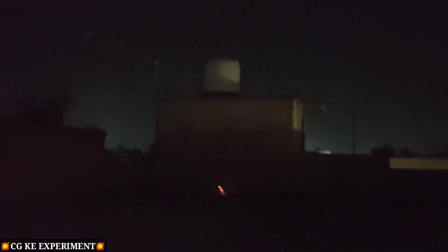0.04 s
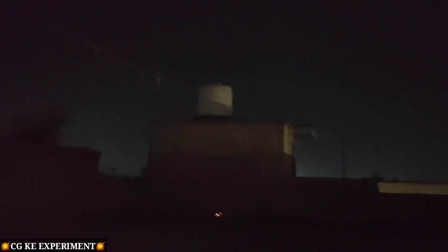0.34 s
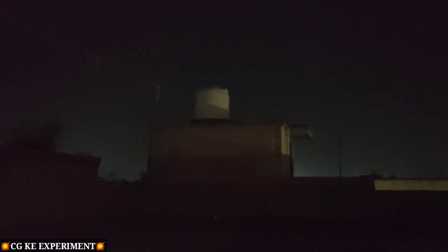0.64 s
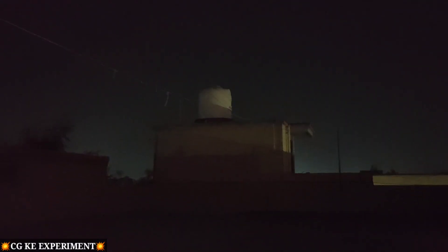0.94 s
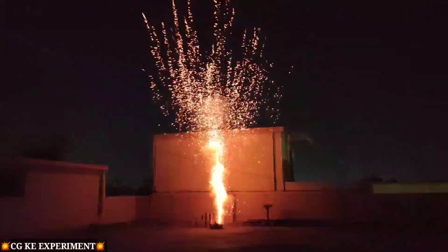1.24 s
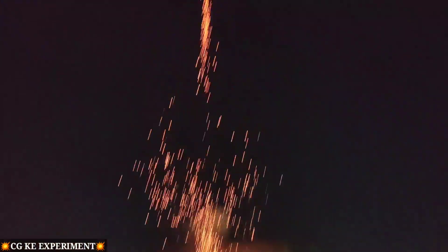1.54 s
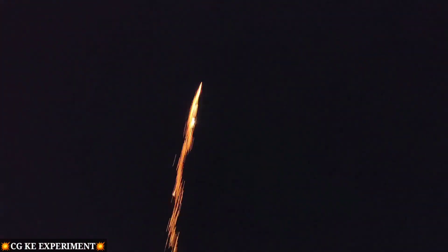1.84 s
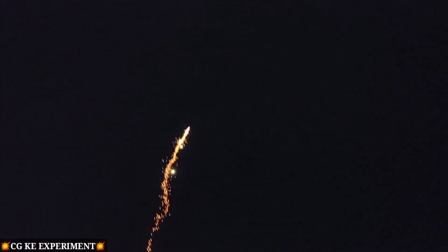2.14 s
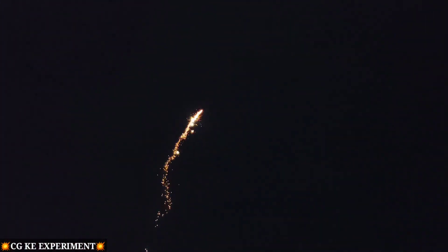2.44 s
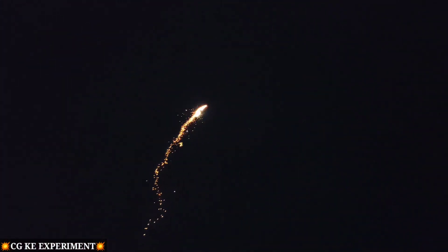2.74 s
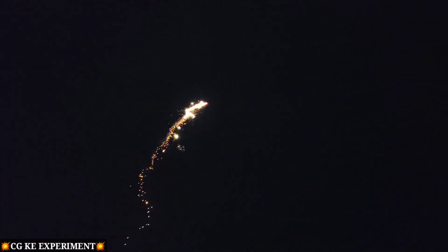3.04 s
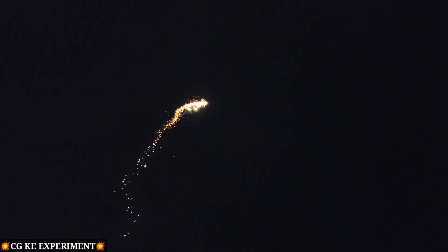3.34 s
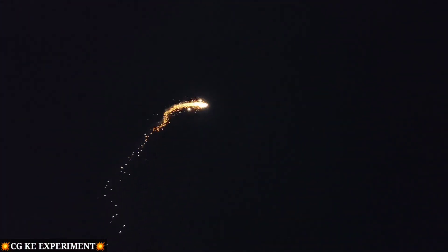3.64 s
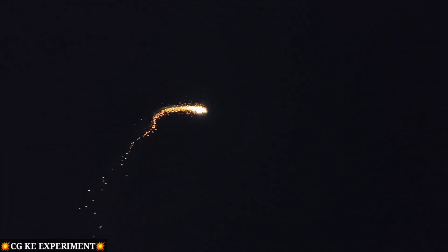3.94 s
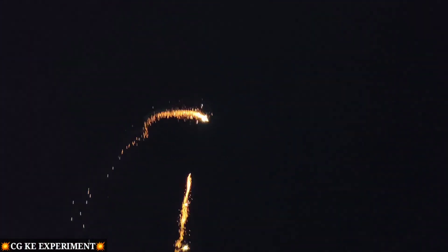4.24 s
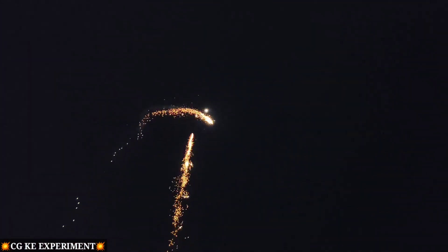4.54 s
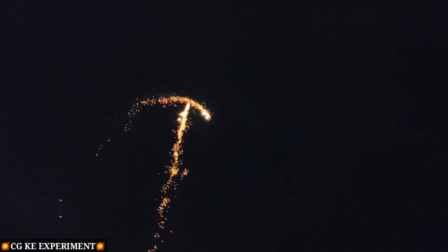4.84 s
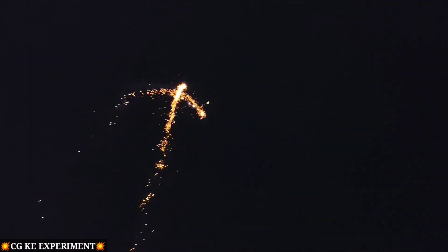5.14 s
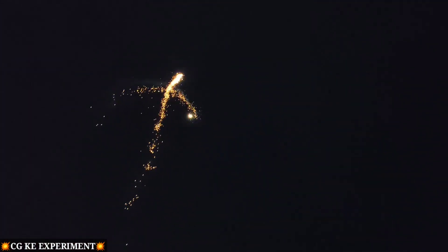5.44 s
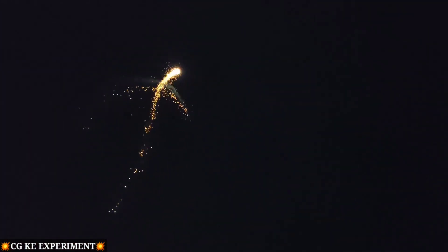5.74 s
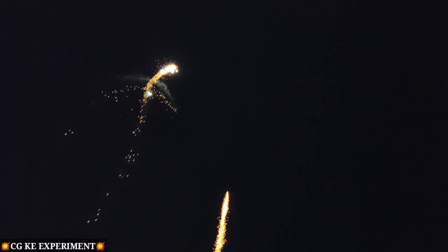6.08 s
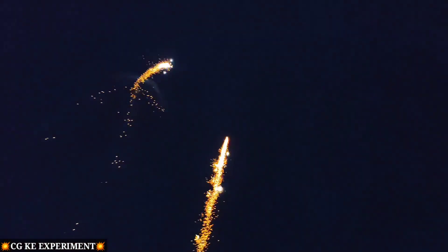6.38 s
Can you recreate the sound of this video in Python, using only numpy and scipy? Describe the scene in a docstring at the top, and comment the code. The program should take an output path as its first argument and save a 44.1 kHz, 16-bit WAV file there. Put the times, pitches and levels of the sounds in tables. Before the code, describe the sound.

In a walled yard at night, a fuse sputters briefly over a low outdoor rumble. A firework cake fires a loud, sharp blast that echoes off the walls. Sparks start snapping overhead and thicken into steady crackling with a fine sizzle, while two more launches follow about two seconds apart. Other fireworks thud dully in the distance. The blasts slightly overload the nearby microphone.

```python
"""A walled yard at night, with a firework cake: the fuse fizzes, a faint whistle swells, three tubes fire.
Each blast rings the tubes and returns from the walls as echoes and reverberation. The comets shed
crackling sparks overhead; each snap is a tiny shock wave, heard directly and by ground reflection.
Other fireworks thud far away over a low outdoor rumble; the recorder's limiter ducks under the blasts."""
import sys
import numpy as np
from scipy import signal
from scipy.fft import rfft, irfft, next_fast_len
from scipy.io import wavfile
from scipy.ndimage import uniform_filter1d, minimum_filter1d, map_coordinates

SR = 44100
rng = np.random.default_rng(int(sys.argv[2]) if len(sys.argv) > 2 else 0)


def generate_wav(sig):
    """Save sig (samples, or channels by samples) to the path in sys.argv[1] as 16-bit PCM at SR."""
    pcm = np.round(np.clip(np.atleast_2d(sig).T, -1, 1) * 32767).astype(np.int16)
    wavfile.write(sys.argv[1], SR, pcm)


N = 282681

# coherence of diffuse outdoor sound: (frequency [Hz], left-right correlation [1])
DIFFUSE_COHERENCE = [(40, 0.69), (150, 0.98), (500, 0.59), (1500, 0.048), (5000, 0.056)]
# surges and lulls of the comets' burning trails: (time [s], level [dB])
TRAIL_LEVEL = [(1.9, -62), (2.03, -75), (2.12, -61), (2.26, -57), (2.32, -51), (2.4, -66), (2.56, -45.5),
               (2.64, -47), (2.72, -41.5), (2.77, -37.5), (2.89, -38.5), (2.96, -35), (3.02, -39.5),
               (3.06, -35), (3.108, -47), (3.169, -37.5), (3.33, -35), (3.44, -37), (3.57, -37),
               (3.62, -34.5), (3.7, -32), (3.85, -31), (3.93, -37.5), (4.07, -38), (4.16, -34.5),
               (4.29, -39), (4.39, -34), (4.52, -38.5), (4.59, -32.5), (4.635, -42), (4.68, -32),
               (4.77, -32.5), (4.87, -33.5), (4.92, -36), (4.959, -43), (5.04, -34.5), (5.12, -30.5),
               (5.2, -34.5), (5.31, -31), (5.38, -35), (5.48, -35.5), (5.58, -39.5), (5.63, -37),
               (5.72, -35), (5.78, -36.5), (5.87, -42), (5.95, -34), (6.04, -38.5), (6.15, -31.5),
               (6.28, -37), (6.36, -33), (6.41, -35.5)]


def amp(db):
    """Decibels to amplitude ratio."""
    return 10 ** (np.asarray(db) / 20)


def unit(x):
    """Normalisation to rms 1."""
    return x / np.sqrt(np.mean(x ** 2) + 1e-20)


def along(points, hz):
    """Interpolation of (frequency [Hz], value) points on a logarithmic frequency axis."""
    f, v = np.transpose(points)
    return np.interp(np.log(hz + 1), np.log(f + 1), v)


def decay(t, t60):
    """Exponential decay from t = 0, by 60 dB every t60."""
    return (t >= 0) * np.exp(-np.log(1000) * np.maximum(t, 0) / t60)


def add(out, s, sound):
    """Superposition of a stereo sound from time s."""
    start = max(round(s * SR), 0)
    part = sound[:, :N - start]
    out[:, start:start + part.shape[1]] += part


def filtered(x, response):
    """Zero-phase filtering by a function of frequency."""
    n = x.shape[-1]
    m = next_fast_len(n + SR // 4)
    return irfft(rfft(x, m) * response(np.fft.rfftfreq(m, 1 / SR)), m)[..., :n]


def coloured(x, spectrum, size=4096):
    """Minimum-phase filtering: nothing sounds ahead of a click."""
    cepstrum = irfft(np.log(amp(along(spectrum, np.fft.rfftfreq(size, 1 / SR)))))
    cepstrum[1:size // 2] *= 2
    cepstrum[size // 2 + 1:] = 0
    impulse_response = irfft(np.exp(rfft(cepstrum)))
    return signal.fftconvolve(x, impulse_response[None], axes=1)[:, :x.shape[1]]


def noise(spectrum, coherence, count):
    """Partially coherent stereo noise of rms 1: the mid-side ratio sets the correlation."""
    turn = lambda hz: np.arccos(np.clip(along(coherence, hz), -1, 1)) / 2
    shape = lambda hz: amp(along(spectrum, hz)) * [np.cos(turn(hz)), np.sin(turn(hz))]
    mid, side = filtered(rng.standard_normal((2, count)), shape)
    return unit(np.array([mid + side, mid - side]))


def wobble(rate):
    """Smooth random modulation, rate knots a second."""
    return map_coordinates(rng.standard_normal(int(N * rate / SR) + 4), [np.arange(N) * rate / SR])


def rumble(trim_db=-1, flutter_db=2):
    """Ambient noise: a low outdoor rumble with a randomly modulated level."""
    # slow drift of the rumble: (time [s], level [dB])
    drift = [(0, -42.5), (.6, -44), (0.801, -47.5), (1.2, -38.5), (2.1, -46), (6.41, -45)]
    # its spectrum: (frequency [Hz], density [dB])
    spectrum = [(25, -4), (50, -19), (100, -3), (140, -4), (175, -2), (230, -10), (300, -16), (900, -21),
                (1400, -32), (1900, -55), (6000, -64)]
    level_db = np.interp(np.arange(N) / SR, *np.transpose(drift)) + trim_db + flutter_db * wobble(22)
    return amp(level_db) * noise(spectrum, DIFFUSE_COHERENCE, N)


def bursts(rows, spectrum, rise_s):
    """Noise transients with exponential rise and decay."""
    out, t = np.zeros((2, N)), np.arange(SR) / SR
    for s, db, t60 in rows:
        envelope = amp(db) * (1 - np.exp(-t / rise_s)) * decay(t, t60)
        add(out, s, envelope * noise(spectrum, DIFFUSE_COHERENCE, len(t)))
    return out


def fuse(sputter_db=3.0, sputters_per_s=220):
    """Combustion noise: the fuse burns in sputtering spurts of hiss and spits one dry tick."""
    # the spurts and the tick: (time [s], level [dB], t60 [s])
    spurts = [(0.002, -37.5, 0.09), (.04, -57, 0.46), (.12, -52.5, 0.38), (.138, -50, 0.27),
              (.333, -65, 0.032), (.425, -64.5, 0.57), (.465, -59, 0.33), (.588, -63, 0.081),
              (.98, -62, 0.013), (1.845, -53.5, 0.09), (1.924, -42, 0.11)]
    tick = [(.1205, -33.5, 0.049)]
    # their spectra: (frequency [Hz], density [dB])
    hiss_spectrum = [(400, 1), (1200, -17), (1800, -17), (3600, -1), (5600, 0), (7200, 9.5), (8200, -12)]
    tick_spectrum = [(200, -35), (550, 7), (1300, 0), (1800, -23), (6000, -24)]
    hiss = bursts(spurts, hiss_spectrum, rise_s=0.00055)
    sputter = unit(amp(sputter_db * wobble(sputters_per_s)))
    return hiss * sputter + bursts(tick, tick_spectrum, rise_s=0.00066)


def far_thuds(rise_s=0.0017, bass_hz=220):
    """Distant fireworks arrive as dull, exponentially decaying transients, some with more bass."""
    # far explosions: (time [s], level [dB], t60 [s], bass shelf [dB])
    thuds = [(.03, -43, 0.075, 13), (1.02, -44, 1.1, -10), (1.809, -44, 0.13, 7), (2.508, -31, 0.76, -12),
             (2.592, -27, 0.65, -1), (3.474, -26, 0.28, 1), (3.51, -28, 1.8, -9.5), (3.70, -26, 0.17, -17),
             (5.555, -36, 0.9, 14)]
    # their spectrum: (frequency [Hz], density [dB])
    spectrum = [(30, -24.5), (60, -22.5), (110, -7.5), (190, -1.5), (250, -10), (360, -1), (480, -9),
                (700, -9.5), (1000, -16), (1800, -30), (5000, -49.5)]
    out, t = np.zeros((2, N)), np.arange(SR) / SR
    for s, db, t60, bass_db in thuds:
        shelf = lambda hz: amp(bass_db / (1 + (hz / bass_hz) ** 4))
        body = filtered(noise(spectrum, DIFFUSE_COHERENCE, len(t)), shelf)
        add(out, s, amp(db) * (1 - np.exp(-t / rise_s)) * decay(t, t60) * body)
    return out


def whistle(pitch_hz=2708, waver_hz=14, flutter_db=3.0):
    """A faint tone, modulated in frequency and amplitude, as the fire creeps into the first tube."""
    # swell of the tone: (time [s], level [dB])
    swell = [(.85, -110), (.9, -90), (1.02, -82), (1.25, -76), (1.3, -120)]
    level_db = np.interp(np.arange(N) / SR, *np.transpose(swell), left=-np.inf, right=-np.inf)
    phase = 2 * np.pi * np.cumsum(pitch_hz + waver_hz * wobble(120)) / SR
    return amp(level_db + flutter_db * wobble(90)) * unit(np.sin(phase))


def blast_tone(hz, bright_db, boom_db, bark_db, knee_hz=900, boom_hz=100, bark_hz=1400):
    """Spectral weighting: a harder charge is brighter and barks more; a bigger one booms more."""
    tilt = bright_db * np.log2(np.maximum(hz / knee_hz, 1))
    boom = boom_db * np.exp(-np.log2((hz + 1) / boom_hz) ** 2)
    bark = bark_db * np.exp(-(np.log2((hz + 1) / bark_hz) / 0.77) ** 2)
    return amp(tilt + boom + bark)


def launches(push_db=-2, push_s=0.00034, front_db=-3, ring_db=-11, detune=.007, common_share=0.28):
    """Impulse excitation: each lift charge's pulse is followed by resonances, echoes and reverberation."""
    # lift charges: (time [s], level [dB], tilt [dB/octave], boom [dB], bark [dB], roll [dB], claps [dB])
    charges = [(1.262, -8.5, 5, -2.5, 1.5, 1.5, -23), (3.8505, -9, 2, 2.5, 3.5, 2, -14),
               (5.7742, -10.5, 3, -2, 0.5, 2.5, -14)]
    # wall reflections, and hard claps off flat house fronts: (delay [s], level [dB])
    walls = [(.012, 1.5), (.036, -6), (.052, -5.5), (.067, -3), (.105, -12), (.134, -12), (.165, -11.5),
             (.21, -15)]
    house_fronts = [(.001, -3), (.065, 0.5), (.111, 3), (.135, -3), (.166, 1.5)]
    # reverberant roll of the yard, then of the far houses: (level [dB], t60 [s])
    rolls = [(-7, .65), (-12.5, 1.5)]
    # resonances of tubes and yard: (frequency [Hz], level [dB], t60 [s])
    modes = [(112.8, -3, 0.88), (312.8, -3, 0.51), (347, 2.5, 0.26), (436, -1.5, 0.51), (569, -7.5, 0.8),
             (634, -9.5, 0.5), (725, -3.5, 1.12), (1096, -12.5, 1.08)]
    # spectra of blast and claps: (frequency [Hz], density [dB])
    blast_spectrum = [(30, -37), (60, -16.5), (90, -12), (115, -2), (150, -5.5), (260, -3.5), (330, -1),
                      (730, -0.5), (950, -7.5), (1150, -13), (1700, -27.5), (2100, -28), (5200, -44),
                      (7200, -45)]
    clap_spectrum = [(400, -12.5), (900, 5.5), (1500, -2), (1900, -10.5), (2600, -8.5), (3500, -11.5),
                     (6000, -37)]
    # coherence of both: (frequency [Hz], left-right correlation [1])
    coherence = [(60, 0.29), (120, 0.76), (250, 0.85), (500, 0.61), (1000, -0.27), (2030, 0.078),
                 (4100, -0.2), (8280, 0.027)]
    out, t = np.zeros((2, N)), np.arange(SR + SR // 2) / SR
    # echoes from different directions add in power
    echo_power = lambda paths, t60: sum((amp(db) * decay(t - delay, t60)) ** 2 for delay, db in paths)
    slap_power = echo_power([(0.0068, front_db)] + walls, t60=.07)
    clap_envelope = np.sqrt(echo_power(house_fronts, t60=.09))
    roll_power = sum((amp(db) * decay(t, t60)) ** 2 for db, t60 in rolls)
    push = amp(push_db) * (1 - t / push_s) * np.exp(-t / push_s)  # compression, then rarefaction
    onset = 1 - decay(t, 0.00098)
    # the tubes stand side by side, so part of the yard's response is the same each time
    common = np.sqrt(common_share) * noise(blast_spectrum, coherence, len(t))
    for s, db, bright_db, boom_db, bark_db, roll_db, claps_db in charges:
        response = common + np.sqrt(1 - common_share) * noise(blast_spectrum, coherence, len(t))
        response = filtered(response, lambda hz: blast_tone(hz, bright_db, boom_db, bark_db))
        echoes = np.sqrt(slap_power + amp(roll_db) ** 2 * roll_power) * response
        ring = np.zeros(len(t))
        for hz, mode_db, t60 in modes:  # no two tubes ring quite alike
            envelope = amp(mode_db + rng.normal(0, 1.1)) * decay(t, t60)
            ring += envelope * np.sin(2 * np.pi * (hz * rng.normal(1, detune) * t + rng.random()))
        claps = amp(claps_db) * clap_envelope * noise(clap_spectrum, coherence, len(t))
        add(out, s, amp(db) * (push + claps + echoes + amp(ring_db) * ring) * onset)
    return out


def shocks(times, levels_db, bounces_db, lengths_s, front_s=.000024, rear_s=.000075, pan_db=2.74):
    """N-waves with a hard front and a softer rear arrive directly, off the ground and off its clutter."""
    # the higher the sparks, the later their ground reflection: (time [s], delay [s])
    ground_delays = [(2, .0058), (2.5, .006), (2.9, .0061), (3.6, .00615), (4.6, .0061), (4.75, .0058),
                     (5.3, .0059), (5.7, .0056), (6.41, .0056)]
    out, t = np.zeros((2, N)), np.arange(SR // 500) / SR
    chance = rng.standard_normal((len(times), 14)).T[:, :, None]
    ground_s = np.interp(times, *np.transpose(ground_delays))[:, None] * (1 + .015 * chance[12])
    clutter_s = ground_s + 0.00037 * np.exp(0.4 * chance[13])
    paths = [(0, levels_db, lengths_s, chance[:4]),
             (ground_s, levels_db + bounces_db - 1.5, lengths_s, chance[4:8]),
             (clutter_s, levels_db + bounces_db - 5, lengths_s / 3, chance[8:12])]
    step = lambda at, edge: 1 - np.exp(-np.maximum(at, 0) / edge)
    for delay, path_db, wave_s, (size, blunt, bearing, pan) in paths:
        length = wave_s[:, None] * np.exp(0.11 * size)
        edge = front_s * np.exp(0.063 * blunt)  # uneven air and rough ground blunt each front
        lag_s = .00005 * np.exp(0.36 * bearing)  # the left microphone is reached later
        index = (np.round((times[:, None] + delay) * SR).astype(int) + np.arange(len(t))).ravel()
        for channel, at, side in [(0, t - lag_s, 0.3), (1, t, -0.75)]:
            wave = (step(at, edge) - step(at - length, rear_s)) * np.clip(1 - 2 * at / length, -0.7, 1)
            wave *= amp(path_db[:, None] + side * pan_db * pan)
            out[channel] += np.bincount(index, wave.ravel(), N)[:N]
    return out


def small_shocks(times, level_db, spread_db, length_s=0.000657):
    """Small sparks: N-waves with log-normal amplitude, reflection strength and duration."""
    strength, bounce, size = rng.standard_normal((len(times), 3)).T
    return shocks(times, level_db + spread_db * strength,
                  bounces_db=-1 + 3 * bounce, lengths_s=length_s * np.exp(.3 * size))


def shed_sparks(trail_db, per_s, over_db, spread_db):
    """Shot noise: sparks at random moments and a steady mean rate, their level following the trail's."""
    slots = np.arange(TRAIL_LEVEL[0][0], N / SR, 1 / per_s)
    times = slots + rng.exponential(1 / per_s, len(slots))
    return small_shocks(times, np.interp(times, np.arange(N) / SR, trail_db) + over_db, spread_db)


def loud_snaps(trim_db=-2.0, followers=2, mean_wait_s=.018, flurry_db=-17.5):
    """Clustered impulses: a big spark bursts and sets off a flurry of smaller ones."""
    # big sparks: (time [s], level [dB], relative ground reflection [dB], N-wave duration [s])
    snaps = [(1.9562, -21, 1.5, 0.00063), (2.0466, -9.5, 2.5, 0.00054), (2.0703, -24.5, 4, 0.00067),
             (2.0931, -11.5, -2.5, 0.00055), (2.1171, -24, 4, 0.0007), (2.1774, -12.5, 4.5, 0.0006),
             (2.204, -18.5, 4, 0.00062), (2.2148, -15.0, -11, 0.00034), (2.234, -21, 1.5, 0.0005),
             (2.2781, -16.5, -2, 0.0009), (2.2912, -9, -1, 0.0006), (2.3103, -17, 6, 0.001),
             (2.323, -23, -9, 0.00048), (2.3251, -15.5, -0.5, 0.00046), (2.33, -23, -5, 0.0006),
             (2.3692, -12.5, 0.5, 0.0007), (2.3727, -17, -5, 0.00065), (2.4047, -9.5, 1.5, 0.0007),
             (2.4234, -31, -9, 0.00045), (2.4584, -5, -0.5, 0.0007), (2.5067, -31, -8, 0.00074),
             (2.5353, -7.5, -1, 0.00055), (2.5652, -15, -9.5, 0.00079), (2.5843, -17.5, -8, 0.00084),
             (2.663, -14.5, 0, 0.00055), (2.6786, -17.5, 6, 0.00063), (2.6864, -18, 4, 0.0007),
             (2.724, -7.5, -5, 0.0007), (2.7557, -15, 4, 0.00068), (2.758, -8, -5, 0.0006),
             (2.7677, -11, -4, 0.00076), (2.8041, -9.5, -1, 0.001), (2.8297, -15, 1.5, 0.0005),
             (2.8526, -14, -3, 0.0006), (2.8607, -19, 8.5, 0.00064), (2.8728, -17.5, -2, 0.0008),
             (2.8958, -5, -6.5, 0.0007), (2.9281, -16, -5, 0.00075), (2.959, -9.5, -4, 0.0009),
             (3.031, -6.5, -3, 0.0006), (3.1333, -11, -4, 0.0007), (3.1484, -12, -1.5, 0.0006),
             (3.2023, -19.5, -4, 0.0005), (3.2219, -10, -4.5, 0.00057), (3.2331, -12, -2, 0.00062),
             (3.267, -13, 3, 0.00097), (3.3078, -11.5, -4, 0.0005), (3.3133, -7.5, -2, 0.00077),
             (3.326, -12.5, -12, 0.00065), (3.3421, -10.5, -2, 0.0006), (3.3543, -15, -10, 0.0006),
             (3.3679, -17.5, 4, 0.0007), (3.3815, -15, -0.5, 0.0005), (3.3858, -16.5, -1.5, 0.0008),
             (3.3907, -13.5, -5, 0.00053), (3.5099, -14, -3.5, 0.00098), (3.5904, -6, -6, 0.00048),
             (3.6127, -7, -6.5, 0.0007), (3.6234, -10, -2, 0.00056), (3.635, -17.5, -1, 0.0005),
             (3.6685, -9, -4.5, 0.0007), (3.7064, -13, -1.5, 0.0015), (3.7955, -9.5, -2, 0.0006),
             (3.8069, -16, -5, 0.0007), (3.9192, -19, -3, 0.00095), (4.0165, -14, -11, 0.00045),
             (4.0304, -17.5, -9, 0.0005), (4.078, -12.5, -6, 0.00059), (4.097, -15.5, 6, 0.0007),
             (4.1017, -24, -5.5, 0.0007), (4.1092, -17.0, -1, 0.00045), (4.1249, -21, -2, 0.0011),
             (4.144, -15.5, 3, 0.0007), (4.1567, -12, -6, 0.00042), (4.1612, -21, 0, 0.00094),
             (4.1691, -11, -10, 0.00061), (4.1793, -17.5, -1.5, 0.00046), (4.2415, -18.0, -3, 0.00065),
             (4.25, -14, -1.5, 0.001), (4.3095, -15, -6, 0.00076), (4.3273, -12.5, -12, 0.00084),
             (4.346, -14, -4.5, 0.00061), (4.369, -11.5, -5.5, 0.00039), (4.3784, -18, 2, 0.0006),
             (4.4005, -14.5, -3, 0.00092), (4.4129, -13, -5, 0.00054), (4.4394, -22, -2, 0.00055),
             (4.4689, -13, 0, 0.0005), (4.5489, -8.5, -2, 0.0007), (4.567, -9.5, -5.5, 0.00082),
             (4.6465, -7, -5, 0.0006), (4.6636, -15.5, 0.5, 0.00054), (4.6726, -17.5, 6.5, 0.0011),
             (4.677, -16, -1, 0.00097), (4.6811, -10, -7, 0.0007), (4.6829, -8.5, -4, 0.00085),
             (4.7085, -14.0, 0, 0.00052), (4.7297, -11.5, -4, 0.00052), (4.7513, -7, -1, 0.0006),
             (4.7589, -18.5, -3, 0.0006), (4.7662, -15.5, 0, 0.00065), (4.8007, -11.5, -1, 0.00041),
             (4.8173, -13.5, 3, 0.0006), (4.8757, -12.5, -8, 0.0007), (4.9121, -9.5, 2.5, 0.00054),
             (4.9155, -11.5, -7, 0.0006), (4.9221, -7.5, -4.5, 0.0011), (4.9728, -6, -2, 0.0006),
             (5.0123, -10, -5, 0.00057), (5.0309, -7, -2, 0.00081), (5.0351, -11, 3.5, 0.001),
             (5.0513, -8.5, -3, 0.00072), (5.0684, -9.5, -4, 0.00088), (5.081, -11, -3.5, 0.0007),
             (5.0951, -8, -11, 0.00074), (5.1028, -10, 1, 0.0008), (5.1071, -12, -4, 0.0009),
             (5.1116, -13, -17, 0.0006), (5.1326, -15, -2, 0.0008), (5.1654, -12.5, -11.5, 0.0007),
             (5.1844, -17.5, 3.5, 0.0008), (5.2138, -12.5, -5, 0.00072), (5.251, -7.5, -4.5, 0.00069),
             (5.3001, -13, -3, 0.00067), (5.318, -12.5, 2, 0.0009), (5.3383, -11.5, -12, 0.00084),
             (5.4167, -12, -8.5, 0.0008), (5.4408, -12, -2, 0.00058), (5.4514, -10.5, -6.5, 0.001),
             (5.5029, -11.5, 3, 0.00054), (5.5372, -8.5, -5, 0.0007), (5.5416, -9.5, -5, 0.00073),
             (5.5739, -8.5, -9, 0.0007), (5.589, -6, -6, 0.00052), (5.5914, -16, 1, 0.00034),
             (5.6402, -13.5, 0.5, 0.00068), (5.6606, -17, 3, 0.00055), (5.685, -4, -11, 0.00062),
             (5.6886, -12, -7, 0.00079), (5.7, -7.5, -19, 0.00059), (5.7248, -7, -7.5, 0.0007),
             (5.7391, -12.0, -7.5, 0.0004), (5.7428, -14, -10, 0.00057), (5.7584, -19.5, 9.5, 0.0004),
             (5.7657, -18, -12, 0.00034), (5.767, -6.5, -12, 0.0011), (5.8442, -14.5, -6, 0.00088),
             (5.957, -15, -2, 0.0007), (5.997, -23, -13, 0.0007), (6.0207, -12, 2.5, 0.001),
             (6.0526, -16.5, -1, 0.00078), (6.0643, -14, -1, 0.0012), (6.0876, -14, -13, 0.00077),
             (6.1137, -16, -5, 0.0004), (6.1186, -23.5, 2, 0.0011), (6.122, -12, -1, 0.0007),
             (6.1244, -12.5, -8, 0.0007), (6.1462, -9, -5, 0.00073), (6.1908, -26.5, 7, 0.00049),
             (6.2025, -11.5, -4, 0.0004), (6.2278, -21.5, 3, 0.0005), (6.2345, -9, -12.5, 0.00056),
             (6.2581, -11.5, -9, 0.0007)]
    s, db, bounce_db, length_s = np.transpose(snaps)
    times = s[:, None] + rng.exponential(mean_wait_s, (len(s), followers))
    flurry = small_shocks(times.ravel(), np.repeat(db, followers) + flurry_db, spread_db=0.5)
    return amp(trim_db) * (shocks(s, db, bounce_db, length_s) + flurry)


def scattered(x, t60, db, samples, positions):
    """Diffuse reflection from roofs and walls, with a new impulse response as the comets move on."""
    out, t = np.zeros((2, N)), np.arange(samples) / SR
    for part in np.array_split(np.arange(N), positions):
        tail = noise([(100, 0.0069), (10000, 0.005)], DIFFUSE_COHERENCE, samples) * decay(t, t60)
        add(out, part[0] / SR, signal.fftconvolve(x[:, part], tail / np.linalg.norm(tail[0]), axes=1))
    return amp(db) * out


def crackle(surge_db=1, surges_per_s=22):
    """Superposed shock waves from overhead, direct and scattered: snaps and ticks over a fine sizzle."""
    # colouring of sound arriving from above: (frequency [Hz], gain [dB])
    overhead = [(60, -8), (180, -1.5), (500, -1.5), (900, -3), (1350, -2.5), (1700, -8), (2100, 0.5),
                (2700, -1), (3800, 8.5), (4500, 9), (5400, 9.5), (6300, 19.5), (6800, 18.5), (7400, 23),
                (8200, 7)]
    # stereo balance of the sparks: (frequency [Hz], left minus right [dB])
    balance = [(500, -1), (1600, -0.5), (2100, -3), (2800, 3), (3800, 4.5), (4800, 2.5), (6300, 6.5),
               (7100, -2)]
    trail_db = np.interp(np.arange(N) / SR, *np.transpose(TRAIL_LEVEL))
    trail_db += surge_db * wobble(surges_per_s)  # the trails burn unevenly
    sizzle = shed_sparks(trail_db, per_s=650, over_db=4.5, spread_db=4)
    ticks = shed_sparks(trail_db, per_s=35, over_db=12.5, spread_db=2.5)
    sparks = coloured(loud_snaps() + ticks + sizzle, overhead)
    sparks = filtered(sparks, lambda hz: amp(along(balance, hz) * np.array([[.5], [-.5]])))
    near = scattered(sparks, t60=0.036, db=-10.5, samples=2048, positions=36)
    yard = scattered(sparks, t60=0.37, db=-10, samples=32768, positions=4)
    return sparks + near + yard


def scene():
    """Linear superposition of all sources at the microphones."""
    return launches() + crackle() + fuse() + whistle() + far_thuds() + rumble()


def limiter(x, ceiling_db=-.5, release_db_per_s=60, window=65):
    """Peak limiting: the gain drops at once under a peak and recovers at a steady rate."""
    over_db = np.maximum(20 * np.log10(np.abs(x).max(axis=0) + 1e-9) - ceiling_db, 0)
    ramp = release_db_per_s * np.arange(N) / SR
    cut_db = np.maximum.accumulate(over_db + ramp) - ramp
    return x * uniform_filter1d(minimum_filter1d(amp(-cut_db), window), window)


def saturated(x, top, order):
    """Soft clipping: peaks round off towards top."""
    return x / (1 + np.abs(x / top) ** order) ** (1 / order)


def record(dry, low_cut_hz=62, band_hz=8050, stop_hz=13300):
    """Band limiting and nonlinear distortion: the blasts overdrive a narrow-band, peak-limited recorder."""
    band = lambda hz: 1 / np.sqrt(1 + (hz / band_hz) ** 56)
    driven = saturated(limiter(filtered(dry, band)), top=.6, order=6)
    thin = signal.sosfilt(signal.butter(2, low_cut_hz, "highpass", fs=SR, output="sos"), driven)
    rounded = saturated(filtered(thin, band), top=.95, order=4)
    return filtered(rounded, lambda hz: (hz < stop_hz) / (1 + (hz / 10500) ** 12))


dry = scene()
out = record(dry)
generate_wav(out)
```